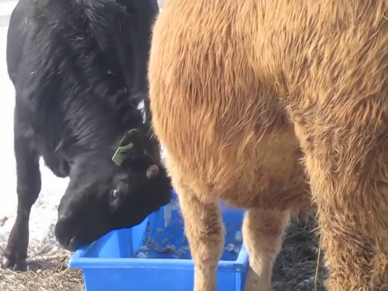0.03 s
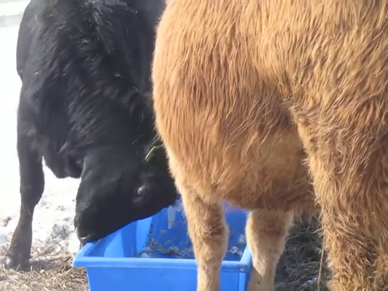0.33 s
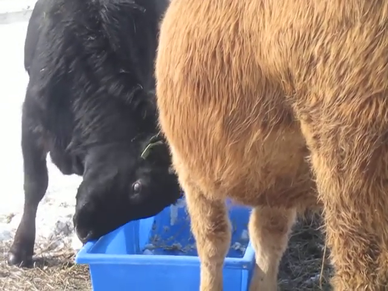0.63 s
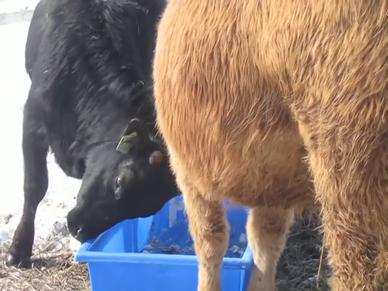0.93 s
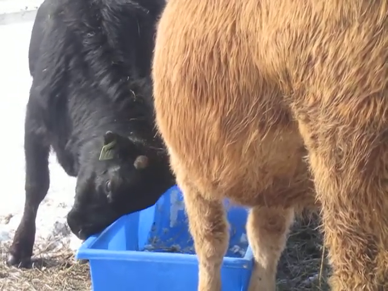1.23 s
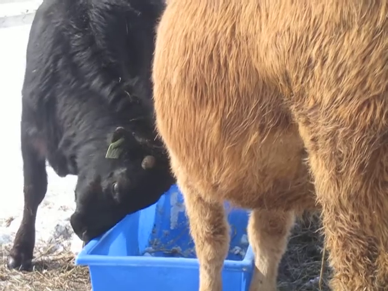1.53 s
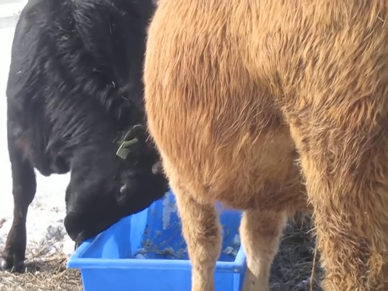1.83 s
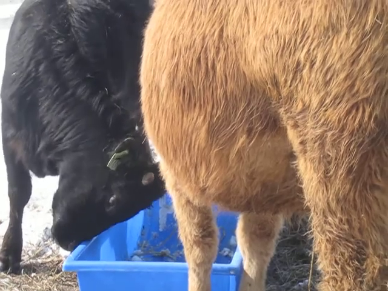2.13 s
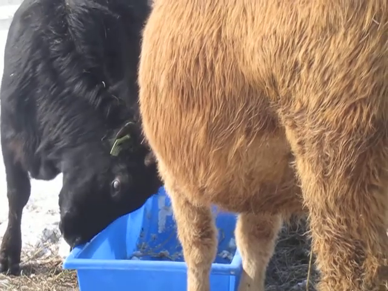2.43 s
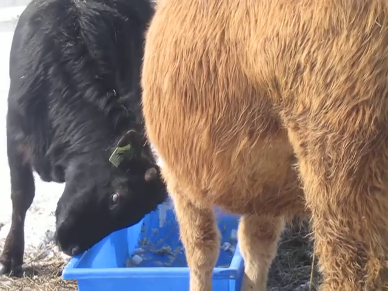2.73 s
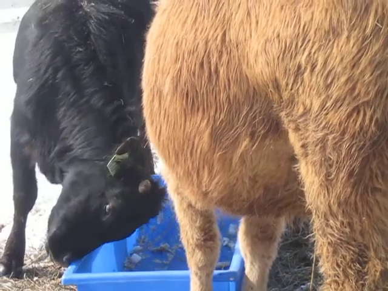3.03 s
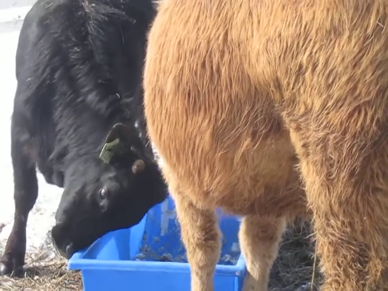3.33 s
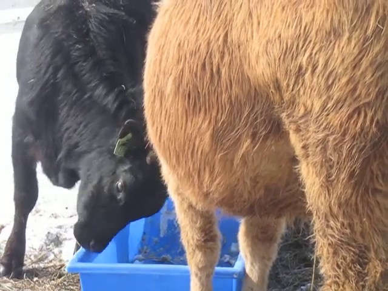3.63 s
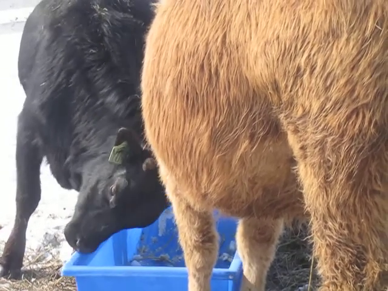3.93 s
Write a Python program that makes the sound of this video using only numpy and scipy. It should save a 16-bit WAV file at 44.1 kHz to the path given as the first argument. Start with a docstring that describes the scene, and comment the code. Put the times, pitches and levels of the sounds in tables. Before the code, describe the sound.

A cow rubs its muzzle along a plastic sled a few metres away, making short rasping creaks and small squeaks, then a louder chattering scrape and a light hissing slide. Wind buffets the microphone in the second half.

```python
"""A cow rubs its muzzle along the rim of a plastic sled, a few metres from the camera in a snowy yard.
The muzzle sticks and slips: rasping creaks and hard jerks ring the rim and the hollow shell,
quick slides squeak, and a long light slide hisses. Behind it a cow hums briefly and straw rustles.
Wind buffets the microphone, mostly in the second half, and the camera itself whines faintly."""
import sys
import numpy as np
from scipy import signal
from scipy.fft import rfft, irfft
from scipy.io import wavfile
from scipy.ndimage import uniform_filter1d

SR = 44100
rng = np.random.default_rng(int(sys.argv[2]) if len(sys.argv) > 2 else 0)


def int16_out(signal):
    """Quantize to a 16-bit WAV file."""
    q = np.round(np.clip(np.atleast_2d(signal).T, -1, 1) * 32767)
    wavfile.write(sys.argv[1], SR, q.astype(np.int16))


N = 176400

# Levels in the tables are relative; each layer adds its own gain.
# Open air all round the yard. Each row: frequency in Hz, level in dB.
AIR_SPECTRUM = [(30, 3), (130, -2), (900, -3.5), (1400, -7.5), (4540, -12), (9190, -17.5), (15500, -32.5)]
# Straw underfoot. Each row: time in seconds, level in dB.
STRAW_LEVELS = [(0.0, -40.5), (0.15, -43.5), (0.21, -51.5), (0.42, -57), (0.56, -58.5), (0.7, -50),
                (0.9, -71)]
# Wind on the microphone, a calm spell and a gusty one. Each row: time in seconds, level in dB.
GUSTS = [
    [(0.0, -82), (0.05, -50.5), (1.0, -65), (1.3, -57), (1.42, -64), (1.86, -44), (2.22, -58.5)],
    [(2.22, -50), (2.308, -38.5), (2.71, -32), (2.74, -41.5), (2.888, -40), (3.786, -35.5), (4.0, -50)],
]
# Its rumble. Each row: frequency in Hz, level in dB.
WIND_SPECTRUM = [(25, -7), (50, 3), (95, 1), (180, -4), (260, -9.5), (450, -26.5), (900, -38), (2000, -53)]
# Eddies right on the microphone. Each row: time in seconds, peak in dB, pitch in Hz.
BUFFETS = [(0.379, -31.5, 266), (.484, -37, 112), (.613, -39, 114), (1.815, -24.5, 76.4), (2.258, -24, 260),
           (2.321, -19.5, 240), (2.366, -22, 246), (2.485, -19, 199), (2.555, -19, 174),
           (2.769, -23.5, 250), (2.875, -19, 198), (2.974, -17, 180), (3.041, -17, 209), (3.215, -22, 134),
           (3.446, -17.5, 205), (3.62, -19, 176), (3.7302, -13, 280), (3.767, -14, 223)]
# A cow's hum, low in the background. Each row: time in seconds, pitch in Hz, level in dB.
HUM_CURVE = [(1.13, 100.2, -52.5), (1.25, 102.5, -47), (1.36, 106, -44), (1.461, 109.6, -45),
             (1.5, 105.4, -46), (1.549, 91, -54)]
# Its harmonics. Each row: multiple of the pitch, level in dB.
HUM_HARMONICS = [(1, 4.5), (2, -32), (3, 4.5), (4, 5.5), (5, -2), (6, -9), (7, 2.5), (8, -4), (9, -13)]
# The sled's rim, a few metres off. Each row: resonance in Hz, width in Hz, level in dB.
RIM_MODES = [(1616, 94, 5), (2160, 68, 11), (2820, 195, 4), (3760, 110, -1), (4150, 100, 2),
             (4880, 390, -6)]
# Its hollow shell. Each row: resonance in Hz, width in Hz, level in dB.
SHELL_MODES = [(150, 15, 3), (242, 73, 1.5), (492, 200, -5.5), (604, 114, -1.5), (724, 150, -8),
               (889, 58, -1.5), (1043, 21, -1.5)]
# Ticks of plastic and straw. Each row: start in seconds, level in dB, centre in Hz, fade in seconds.
TICKS = [(0.291, -33, 2030, .005), (.3732, -27, 980, 0.0025), (0.3998, -26.5, 2480, 0.0013),
         (0.53, -30, 10500, .0007), (1.524, -26, 2120, 0.0056), (2.482, -18.5, 3420, 0.0037),
         (2.618, -30.5, 1490, 0.0065), (2.645, -21.5, 2530, 0.0012), (3.565, -25, 2250, .004)]
# Hiss of light rubbing, on plastic or in straw. Each row: frequency in Hz, level in dB.
HISS_SPECTRUM = [(290, -36), (500, -3), (1620, -1.5), (2230, -1), (3430, -7), (6930, -14.5), (8980, -10),
                 (15500, -26)]
# Short slides, a curve each. Each row: time in seconds, then middle, presence and treble in dB.
SHORT_SLIDES = [
    [(0.0, -47, -45, -66), (.15, -54, -39.5, -45), (.175, -55, -56, -62)],
    [(.88, -78, -65, -79), (.954, -45, -41, -49), (.99, -59, -63, -80), (1.024, -58, -44.5, -41),
     (1.14, -39.5, -38, -55)],
    [(2.38, -64, -53.5, -55), (2.472, -53, -44.5, -52), (2.53, -50, -59, -60)],
]
# The long closing slide. Each row: time in seconds, then middle, presence and treble in dB.
LONG_SLIDE = [(3.04, -50, -36, -51), (3.2, -49.5, -51, -56.5), (3.38, -47.5, -35.5, -46),
              (3.44, -47.5, -40.5, -43.5), (3.492, -39.5, -30.5, -43.5), (3.538, -45, -44, -43.5),
              (3.666, -34.5, -34, -52), (3.788, -52.5, -62, -63), (3.845, -46.5, -38.5, -65),
              (3.908, -53, -64, -88)]
# The resonance under that slide. Each row: time in seconds, centre in Hz, level in dB.
SLIDE_RESONANCE = [(3.17, 1700, -53.5), (3.38, 2395, -39), (3.448, 2150, -50), (3.658, 2237, -38),
                   (3.771, 1876, -58)]
# Squeaks on the rim. Each row: start and length in seconds, pitch at start, middle and end in Hz,
# level in dB, slope in dB per overtone, roughness from 0 to 1.
SQUEAKS = [(0.105, 0.041, 3910, 3930, 4340, -37.5, -6, .5),
           (0.71, 0.05, 2336, 2310, 2400, -36.5, -19.5, 0.16),
           (0.767, .055, 4210, 3340, 2930, -52.5, -20, 0.85), (0.772, 0.042, 542, 464, 417, -45, -8, .2),
           (.934, 0.036, 2295, 2596, 2330, -44, -9, 0.9), (0.993, 0.032, 514, 433, 380, -49, -12, 0.1),
           (1.009, .052, 1980, 2300, 2460, -48, 0.5, 0.31), (1.034, 0.041, 2190, 2360, 2270, -39, -6, 0.34),
           (1.064, 0.062, 2500, 2835, 2900, -45.5, -13, 0.43),
           (2.339, 0.087, 2575, 3160, 2910, -45, -23, 0.54), (2.435, 0.056, 1934, 2080, 2270, -41, 0, .8),
           (2.445, .032, 4000, 4220, 4500, -39.5, -12, 0.38),
           (3.241, 0.044, 8000, 9300, 8900, -46, -30, 0.65)]
# Hard jerks of the muzzle. Each row: start in seconds, level in dB, slip in seconds, settled ring in Hz.
JERKS = [(1.866, -17.5, 0.001, 2610), (1.8967, -14.5, 0.00096, 2510), (1.923, -24.5, 0.0024, 2820),
         (1.9514, -19.5, 0.0019, 2800), (2.8279, -10.5, .002, 3415), (2.8664, -5.5, 0.0047, 2555),
         (2.889, -9, 0.0065, 3040), (2.9075, -8.5, 0.0061, 2720), (2.9327, -10, 0.0063, 2835),
         (2.9588, -9, .005, 2880), (2.98, -8.5, 0.0059, 2850), (3.002, -11, 0.0075, 2950),
         (3.027, -10, 0.0052, 2960)]
# Their crack. Each row: frequency in Hz, level in dB.
JERK_SPECTRUM = [(400, -6), (1000, -20), (1900, -6.5), (2500, 7), (3600, -8), (5000, -5.5), (6500, -7),
                 (7400, -14), (9500, -12), (11500, -23), (15500, -45)]
# Creaking strokes. Each row: start and end in seconds, slips per second at start and end, unevenness
# from 0 to 1, slip in seconds, treble tilt in dB per octave, then middle, scrape and contact ring in dB.
STROKES = [(0.018, 0.123, 132, 183, 0.14, 0.0022, 1, 10.5, -4, -1.5),
           (1.082, 1.367, 100, 82, .15, 0.0029, -1, -1.5, -4.5, -1.5),
           (1.5385, 1.654, 120, 103, 0.09, 0.0023, -3, -23, -15.5, -9),
           (1.785, 1.857, 65.6, 45, 0, 0.0017, -2, -13, -18, -14),
           (1.8662, 1.978, 147, 124, 0.3, 0.0038, -7, 0, -12, -2),
           (1.9745, 2.04, 77.8, 170, 0, 0.0035, -2, 3.5, -2, -11),
           (2.867, 3.038, 173, 165, 0.31, 0.0021, -0.5, 1, -5, -21),
           (3.043, 3.143, 194, 107, 0.02, 0.0044, -1, 10, 5, -19)]
# Force of the rubbing, a curve for each push. Each row: time in seconds, rasp in dB, shell in dB.
PUSHES = [
    [(0.0, -36.5, -48.5), (0.07, -32, -40.5), (0.12, -39, -57)],
    [(1.05, -44, -75), (1.138, -38.5, -49.5), (1.342, -34, -37.5), (1.362, -35, -46), (1.39, -73, -46)],
    [(1.5, -54, -53), (1.53, -37.5, -51), (1.556, -31.5, -41), (1.652, -30, -38), (1.7, -59, -60)],
    [(1.76, -51, -56.5), (1.85, -43, -42.5), (1.89, -40.5, -42), (1.965, -40, -42.5), (1.99, -34, -37),
     (2.026, -34.5, -39), (2.07, -94, -60)],
    [(2.85, -53, -55), (2.866, -47, -47.5), (3.02, -33.5, -36.5), (3.052, -20.5, -30.5), (3.112, -60, -46),
     (3.15, -58, -85)],
]
# Rasp of muzzle on rim. Each row: frequency in Hz, level in dB.
RASP_SPECTRUM = [(400, -25.5), (700, -7.5), (1200, -13), (1700, -3.5), (2200, -4), (2900, -3), (3600, -3.5),
                 (4500, -6), (6300, -12.5), (7200, -16.5), (9300, -13), (12000, -28), (15500, -39)]

MIDDLE_HZ, TREBLE_HZ = 1930, 2880  # the rasp's middle lies below the first; tilts start at the second
CONTACT_HZ, CONTACT_SPREAD = 2860, 0.1  # the spot under the muzzle rings a little differently each slip
CATCH_S = 0.0145  # a small second crack as the muzzle catches again
SLIP_SAMPLES = N // 100  # room for one slip to die away


def undb(db):
    """Decibels to gain."""
    return 10 ** (np.asarray(db) / 20)


def unit(x):
    """Scale to rms 1."""
    return x / np.sqrt(np.mean(x ** 2) + 1e-18)


def clock():
    """Time of every sample in seconds."""
    return np.arange(N) / SR


def noise():
    """White noise."""
    return rng.standard_normal(N)


def walk(rate):
    """Smooth random drift with rms 1; a higher rate moves faster."""
    span = max(int(SR / rate), 1)
    return unit(uniform_filter1d(uniform_filter1d(noise(), span), span))


def fader(rows, column=1):
    """Gain along a dB curve, silent outside it."""
    rows = np.array(rows)
    return undb(np.interp(clock(), rows[:, 0], rows[:, column], left=-200, right=-200))


def phase_of(hz):
    """Running phase of a moving pitch, in radians."""
    return 2 * np.pi * np.cumsum(hz) / SR


def colour(x, points, tilt_db=0):
    """Causal filter through (Hz, dB) points, its treble tilted per octave; white noise keeps its power."""
    hz, db = np.array(points).T
    octave = np.log2(np.maximum(np.arange(1025) * SR / 2048, 1))
    tilt = tilt_db * np.maximum(octave - np.log2(TREBLE_HZ), 0)
    gain = unit(undb(np.interp(octave, np.log2(hz), db) + tilt))
    cepstrum = irfft(np.log(gain))
    fold = np.r_[1, np.full(1023, 2), 1, np.zeros(1023)]  # to minimum phase
    return signal.fftconvolve(x, irfft(np.exp(rfft(cepstrum * fold))))[:N]


def band(x, hz, width):
    """One resonance, gain 1 at its centre."""
    return signal.lfilter(*signal.iirpeak(hz, hz / width, fs=SR), x)


def cut(x, hz, kind):
    """Gentle low-pass or high-pass."""
    return signal.sosfilt(signal.butter(2, hz, kind, fs=SR, output="sos"), x)


def steep(x, hz, kind):
    """The gentle cut, twice over."""
    return cut(cut(x, hz, kind), hz, kind)


def ring(x, modes):
    """A bank of resonances; white noise roughly keeps its power."""
    power = sum(undb(db) ** 2 * np.pi * width / SR for hz, width, db in modes)
    return sum(undb(db) * band(x, hz, width) for hz, width, db in modes) / np.sqrt(power)


def yard_air():
    """Still outdoor air, its level drifting slightly."""
    air = colour(noise(), AIR_SPECTRUM)
    return air / np.std(cut(air, 220, "high")) * undb(-52.5 + walk(3.5))


def straw(snaps_per_s=110, snap_fade_s=0.00048):
    """Straw underfoot rustles at first and crackles faintly throughout."""
    grain = noise() * undb(1.7 * walk(120))
    rustle = unit(colour(grain, HISS_SPECTRUM, tilt_db=0.53)) * fader(STRAW_LEVELS)
    impulses = (rng.random(N) < snaps_per_s / SR) * noise()
    snaps = signal.fftconvolve(impulses, noise() * np.exp(-clock() / snap_fade_s))[:N]
    crackle = unit(steep(band(snaps, 5900, width=7800), 11200, "low"))
    return undb(-3) * rustle + undb(-67) * crackle


def camera_whine(hz=5890):
    """The camera's own thin, wavering tone, close by the microphone."""
    return np.sin(phase_of(hz + 6 * walk(49))) * undb(-63 + 2 * walk(23))


def wind(flutter_db=3.5, buffet_cycles=0.29):
    """Fluttering rumble that follows the gusts, and single eddies that thump the microphone."""
    t = clock()
    rumble = cut(colour(noise(), WIND_SPECTRUM), 22, "high") * undb(flutter_db * walk(48))
    out = undb(2) * unit(rumble) * sum(fader(spell) for spell in GUSTS)
    for (at, db, hz), turn in zip(BUFFETS, rng.random(len(BUFFETS))):
        cycles = (t - at) * hz
        swell = 1 / np.cosh(np.clip(cycles / buffet_cycles, -20, 20))
        out += undb(db - 1) * swell * np.cos(2 * np.pi * (cycles + turn))
    return out


def cow_hum(jitter=0.0068):
    """A cow's soft, closed-mouth low."""
    times, hz, _ = np.array(HUM_CURVE).T
    phase = phase_of(np.interp(clock(), times, hz) * (1 + jitter * walk(54)))
    voice = sum(undb(db) * np.sin(k * phase) for k, db in HUM_HARMONICS)
    return unit(voice) * fader(HUM_CURVE, column=2)


def ticks():
    """Plastic and straw tick: one short crack each, with a little ring of the sled."""
    t, cracks = clock(), 0
    for at, db, hz, fade in TICKS:
        crack = noise() * (t >= at) * np.exp(-np.abs(t - at) / fade)
        cracks += undb(db - 9.5) * band(crack, hz, width=hz) * np.sqrt(SR / (np.pi * hz))
    body = undb(-5.5) * ring(cracks, RIM_MODES) + undb(-13) * ring(cracks, SHELL_MODES)
    return cut(cracks, 9700, "low") + body


def sliding(grain_db=2, low_split_hz=2790, high_split_hz=6700):
    """Hair and muzzle glide over the plastic with a grainy hiss whose colour shifts with the pressure."""
    hiss = colour(unit(noise() * undb(grain_db * walk(270))), HISS_SPECTRUM)
    upper = steep(hiss, low_split_hz, "high")
    middle = unit(steep(hiss, low_split_hz, "low"))
    presence = unit(steep(upper, high_split_hz, "low"))
    treble = unit(steep(upper, high_split_hz, "high"))
    slide = lambda rows: middle * fader(rows, 1) + presence * fader(rows, 2) + treble * fader(rows, 3)
    short = steep(sum(slide(rows) for rows in SHORT_SLIDES), 11100, "low")
    return undb(-2) * short + undb(-1.5) * slide(LONG_SLIDE)


def slide_resonance(width_hz=390):
    """The long slide excites a narrow resonance that rises and falls with the pressure."""
    times, hz, _ = np.array(SLIDE_RESONANCE).T
    phase = phase_of(np.interp(clock(), times, hz))
    grain = cut(noise() + 1j * noise(), width_hz / 2, "low")
    return unit(np.real(grain * np.exp(1j * phase))) * fader(SLIDE_RESONANCE, column=2)


def squeaks(edge_s=0.011, jitter=0.098):
    """Fast stick-slip on wet plastic: arching, unsteady tones with overtones."""
    t, out = clock(), np.zeros(N)
    wobble, flutter = walk(1840) + 0.22 * walk(180), walk(230)
    for start, length, hz0, hz1, hz2, db, slope_db, rough in SQUEAKS:
        on = (t >= start) & (t < start + length)
        progress = (t[on] - start) / length
        arch = np.polyval(np.polyfit([0, .5, 1], [hz0, hz1, hz2], 2), progress)
        phase = phase_of(arch * (1 + jitter * rough * wobble[on]))
        tone = sum(undb(slope_db * k) * np.sin((k + 1) * phase) for k in range(8))
        tone = unit(cut(cut(tone, 4900, "low"), 7800, "low"))
        edge = np.minimum(np.minimum(progress, 1 - progress) * length / edge_s, 1)
        out[on] += undb(db + 5.8 * rough * flutter[on]) * edge * tone
    return out


def slip_envelope(age, length, fade, curve=1):
    """One slip: rises for half its length, holds to its end, then dies away."""
    return np.minimum(2 * age / length, 1) ** curve * np.exp(-np.maximum(age - length, 0) / fade)


def jerks(crack_fade_s=0.0014, ring_fade_s=0.0038, sag=0.488, sag_s=0.00256):
    """Hard slips, mostly in quick chattering runs: each a bright burst, a sagging ring, a small catch."""
    age = clock()[:SLIP_SAMPLES]
    bursts, rings = np.zeros(N), np.zeros(N)
    for at, db, length, ring_hz in JERKS:
        span = slice(int(at * SR), int(at * SR) + len(age))
        grit = rng.standard_normal(len(age))
        spot_hz = 4600 * np.exp(CONTACT_SPREAD * rng.standard_normal())
        grit = unit(grit + undb(-10) * unit(band(grit, spot_hz, width=770)))
        catch = undb(-8) * (age > CATCH_S) * np.exp(-np.abs(age - CATCH_S) / crack_fade_s)
        bursts[span] += undb(db - 12.5) * grit * (slip_envelope(age, length, crack_fade_s) + catch)
        hz = ring_hz * (1 + sag * np.exp(-age / sag_s))  # starts sharp, sags as the slip slows
        rings[span] += undb(db - 13.5) * slip_envelope(age, length, ring_fade_s) * np.sin(phase_of(hz))
    return colour(bursts, JERK_SPECTRUM) + rings + undb(-10.5) * ring(bursts, RIM_MODES)


def stick_slip(start, end, rate0, rate1, uneven, length, scrape_db):
    """One stroke: noise bursts over a weaker scrape, and the contact spot's ring; each near rms 1."""
    crack_fade_s, ring_fade_s, scatter_db = 0.00053, 0.0023, 2
    t, at = clock(), start
    inside = (t >= start) & (t < end)
    grip, contact = undb(scrape_db) * inside, np.zeros(N)
    age = t[:SLIP_SAMPLES]
    catch = undb(-11) * (age > CATCH_S) * np.exp(-np.abs(age - CATCH_S) / crack_fade_s)
    burst = slip_envelope(age, length, crack_fade_s, curve=.5) + catch
    ring_envelope = slip_envelope(age, length, ring_fade_s, curve=.5)
    for late, size, pitch in rng.standard_normal(size=(80, 3)):
        if at >= end:
            break
        span = slice(int(at * SR), int(at * SR) + len(age))
        strength = undb(scatter_db * uneven * size)
        hz = CONTACT_HZ * np.exp(CONTACT_SPREAD * pitch)
        grip[span] += strength * burst
        contact[span] += strength * ring_envelope * np.sin(2 * np.pi * hz * age)
        at += np.exp(uneven * late) / np.interp(at, [start, end], [rate0, rate1])
    return grip * noise() / np.sqrt(np.mean(grip[inside] ** 2)), contact / np.std(contact[inside])


def creaks():
    """The muzzle's slips crack on the rim and ring the contact spot, the rim and the hollow shell."""
    force = sum(fader(push) for push in PUSHES)
    shell_force = sum(fader(push, column=2) for push in PUSHES)
    rasp, spots, friction = 0, 0, 0
    for *timing, treble_db, middle_db, scrape_db, contact_db in STROKES:
        stroke, contact = stick_slip(*timing, scrape_db)
        drive = undb(-1.5) * force / np.hypot(1, undb(contact_db))  # rasp and spot share the power
        spectrum = [(hz, db + middle_db / (1 + (hz / MIDDLE_HZ) ** 8)) for hz, db in RASP_SPECTRUM]
        rasp += colour(stroke * drive, spectrum, treble_db)
        spots += undb(contact_db) * contact * drive
        friction += stroke
    rim = spots + undb(-9.5) * ring(friction * force, RIM_MODES)
    rim = cut(cut(rim, 7200, "low"), 1150, "high")
    shell = cut(ring(friction * shell_force, SHELL_MODES), 910, "low")
    return rasp + rim + undb(3.5) * shell


def scene(echo_db=-20.5, echo_t60_s=0.12, echo_delay_s=0.006):
    """From the camera, in mono: the sled with a faint scatter off ground and cattle, over the yard."""
    sled = creaks() + jerks() + ticks() + squeaks() + sliding() + slide_resonance()
    tail = cut(noise(), 2840, "low") * undb(-60 * clock() / echo_t60_s) * (clock() > echo_delay_s)
    echo = signal.fftconvolve(sled, tail / np.linalg.norm(tail))[:N]
    background = cow_hum() + wind() + yard_air() + straw() + camera_whine()
    return (sled + undb(echo_db) * echo + background)[None]


def record(dry):
    """The camera cuts the top steeply at 15850 Hz."""
    return signal.sosfilt(signal.ellip(10, .2, 80, 15850, fs=SR, output="sos"), dry)


dry = scene()
out = record(dry)
int16_out(out)
```